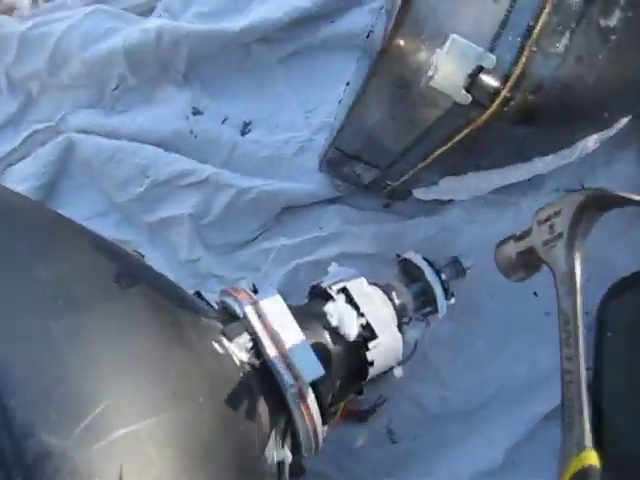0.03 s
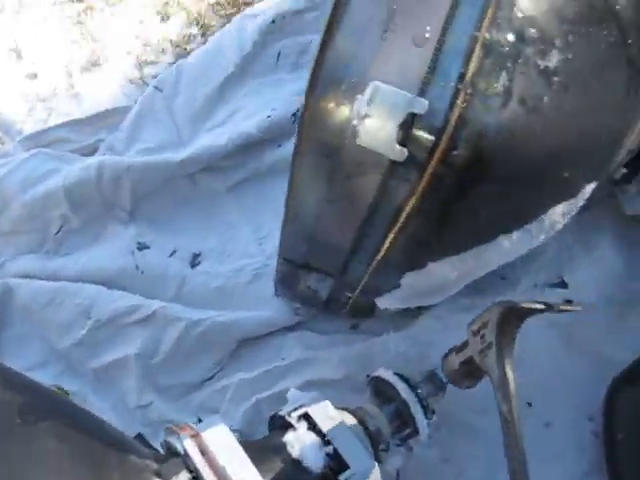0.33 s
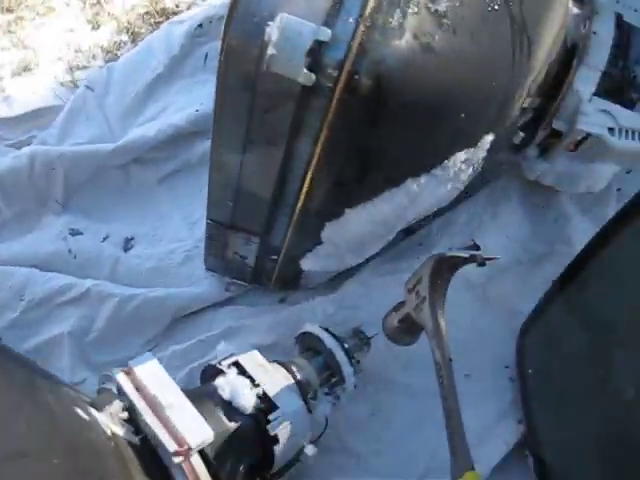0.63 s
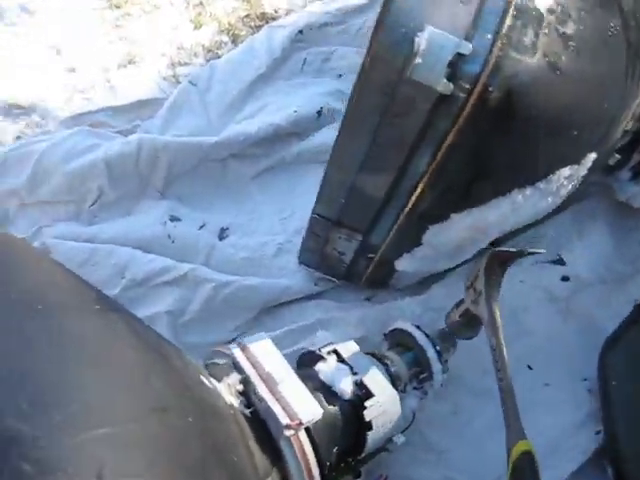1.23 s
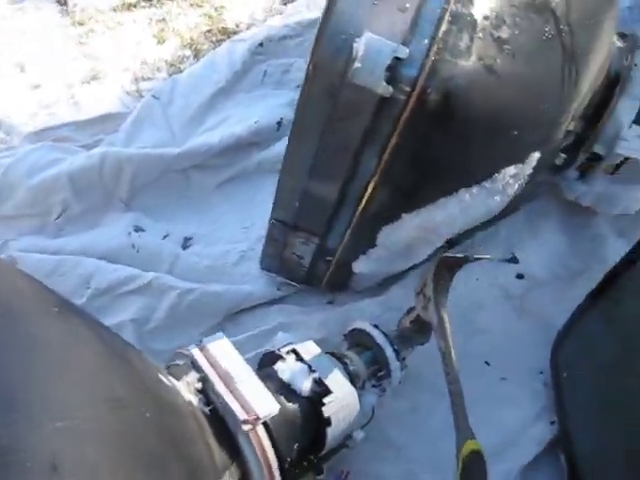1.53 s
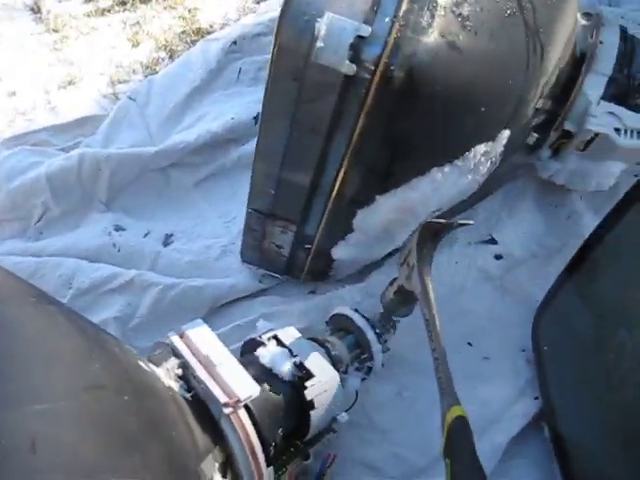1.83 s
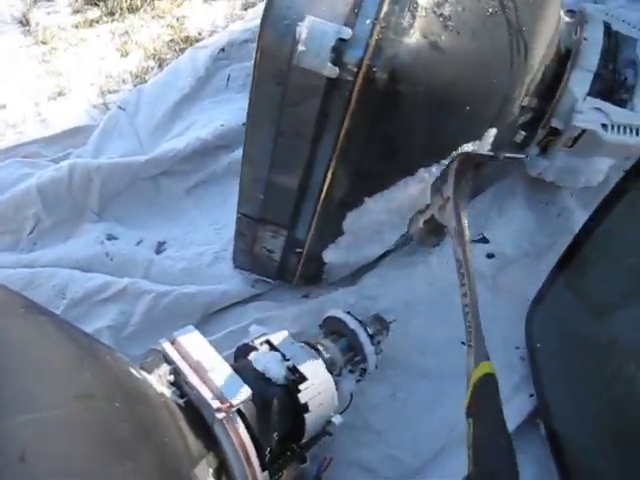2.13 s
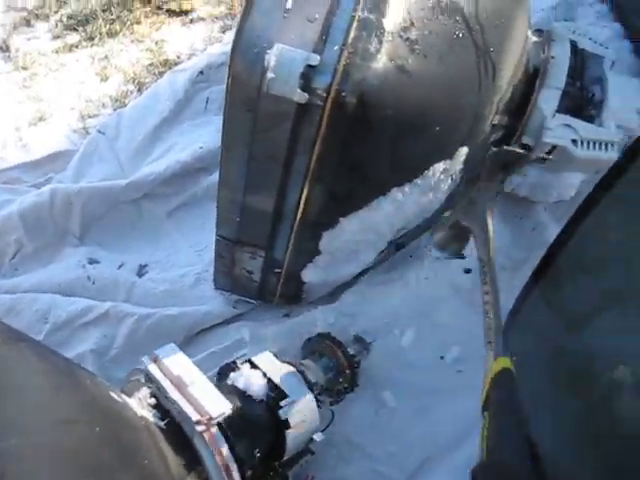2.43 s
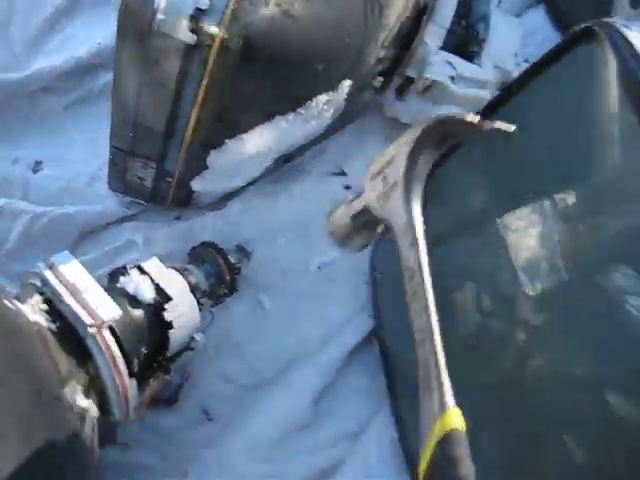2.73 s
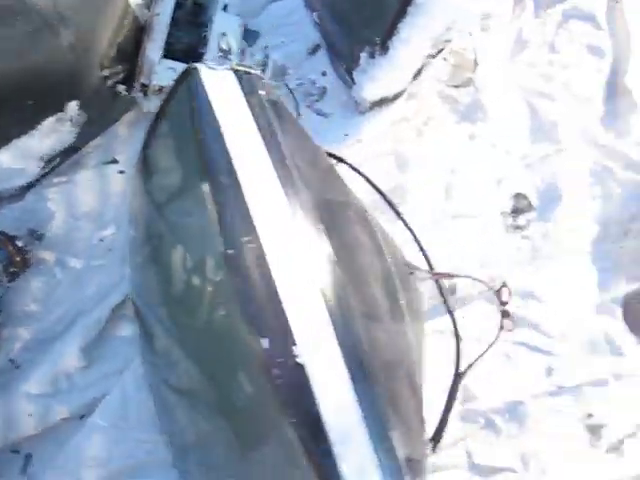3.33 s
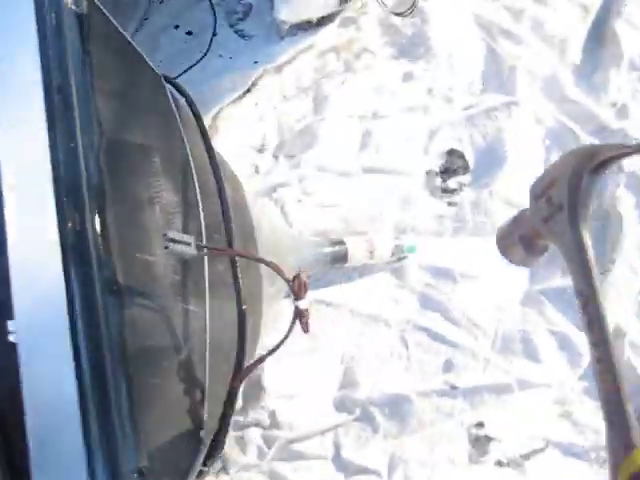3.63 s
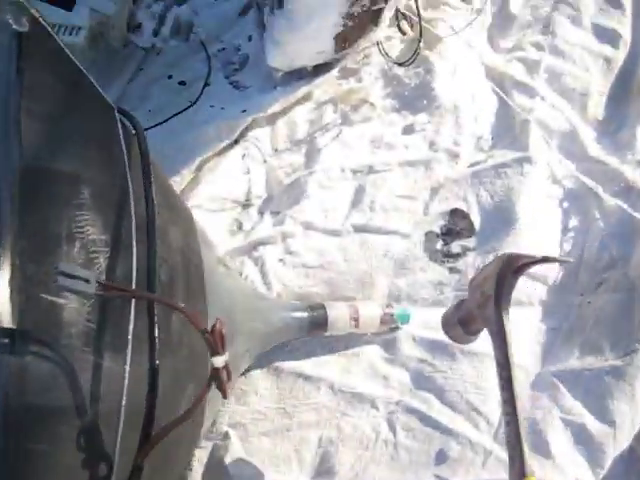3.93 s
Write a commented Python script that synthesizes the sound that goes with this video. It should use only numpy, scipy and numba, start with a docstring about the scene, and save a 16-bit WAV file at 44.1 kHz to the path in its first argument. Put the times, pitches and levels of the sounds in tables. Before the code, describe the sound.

Three ringing hammer taps crack a glass picture tube, followed by a short, loud hiss.

```python
"""Breaking the vacuum of a picture tube

Outdoors, a steel hammer strikes the tube's glass neck three times; head and tube ring in their modes.
The third blow cracks the neck, and air hisses into the vacuum until the pressures are equal.
Clothing swishes and a hand-held camera is bumped, over a distant motor's hum and whine.
The camera's gain control ducks after each blow."""
import sys
import numpy as np
from scipy import signal
from scipy.fft import rfft, irfft, next_fast_len
from scipy.io import wavfile
from scipy.ndimage import map_coordinates
from numba import njit

SR = 44100
rng = np.random.default_rng(int(sys.argv[2]) if len(sys.argv) > 2 else 0)


def waveform_to_disk(signal):
    """Save audio, clipped to [-1, 1], as 16-bit WAV at the path in sys.argv[1]."""
    frames = np.transpose(np.atleast_2d(signal))
    scaled = np.clip(frames, -1, 1) * 32767
    samples = np.round(scaled).astype(np.int16)
    wavfile.write(sys.argv[1], SR, samples)


N = 176400

# level of the motor as the camera moves: time_s, level_db
MOTOR_LEVELS = [(0, -33.5), (.6, -31), (2.3, -30.5), (2.799, -44), (3.15, -38.5), (3.5, -36.5), (4, -32)]
# steady tones of its whine: pitch_hz, relative_db
WHINE_TONES = [(1965, -57), (2745, -59), (2773.5, -46.5)]
# spectrum of the open air: frequency_hz, density_db
AIR_SPECTRUM = [(20, 6), (50, 16), (95, 10), (160, 2), (350, -6.5), (800, -9.5), (2000, -11.5),
                (2800, -9.5), (4000, -14.5), (5500, -17)]
HUM_HZ, HUM_DRIFT_HZ, WHINE_GAIN_DB, AIR_DB = 57.3, 0.35, 32.3, -39.5

# swish as the arm takes aim: time_s, relative_treble_db, relative_middle_db
AIM_SWISH = [(0.0, -39.5, -43.5), (0.048, -36.5, -41), (0.24, -30, -39), (.44, -34, -42), (.57, -40.5, -44),
             (0.8, -46, -48.5), (0.848, -41.5, -47), (1.072, -45, -48), (1.25, -69, -64)]
# swish on moving to the next tube: time_s, relative_treble_db, relative_middle_db
MOVE_SWISH = [(2.8, -45.5, -45.5), (2.83, -43, -47), (3.32, -52.5, -57.5), (3.34, -38, -42),
              (3.468, -46, -50), (3.574, -47, -54.5), (3.664, -48.5, -48.5), (3.688, -50.5, -57),
              (4.0, -49, -52)]
# treble and middle bands of rubbing cloth: frequency_hz, density_db
CLOTH_TREBLE = [(1200, -22), (2200, 0.5), (3100, 1.5), (4500, 0), (5500, -4)]
CLOTH_MIDDLE = [(80, -17), (280, 1), (500, -3), (1100, -2.5), (1900, -6), (2800, -21)]
# crinkles of cloth: start_s, level_db, t60_s
CRINKLES = [(2.778, -17, .035), (2.8477, -16, .025), (2.976, -27, 0.096), (3.2147, -27, 0.06),
            (3.341, -12.5, 0.046), (3.819, -24, 0.045)]
# spectrum of a crinkle: frequency_hz, density_db
CRINKLE_SPECTRUM = [(150, -18.5), (600, -2), (1500, -3), (3300, 4.5), (5500, 2.5)]

# bumps on the camera body: start_s, level_db, pitch_hz
BUMPS = [(0.278, -18.5, 310), (.377, -19, 285), (.463, -21, 230), (0.578, -21, 132), (2.915, -15.5, 185),
         (2.976, -14.5, 114), (3.301, -7.5, 81), (3.357, -12.5, 150), (3.973, -8, 79.4)]
BUMP_T60_CYCLES, BUMP_RISE_S = 4, .0015

# scuffs of shifting and stepping over: centre_s, level_db, half_width_s
SCUFFS = [(.466, -36, .005), (.581, -37, .011), (3.082, -38.5, 0.012), (3.175, -40, .012),
          (3.391, -33, 0.039), (3.49, -38, 0.041), (3.646, -38.5, 0.031)]
# spectrum of a scuff: frequency_hz, density_db
SCUFF_SPECTRUM = [(150, -19), (500, 2), (900, 3.5), (1600, -27), (4000, -12.5)]

# contacts on the intact neck, the first blow touching twice: start_s, level_db, crack_db, top_modes_db
CONTACTS = [(1.5326, 5.5, 0, -1), (1.5813, -4, -4, -7), (1.9092, 4.5, 2, 4)]
# crack of contact, coloured by the neck: frequency_hz, density_db
CRACK_SPECTRUM = [(330, 4), (1000, -9), (1350, -3), (1950, -14), (2550, 4), (3080, -2), (3600, 6),
                  (4300, -2), (6000, -7)]
# dense, faint ring of the glass: frequency_hz, density_db
SHIMMER_SPECTRUM = [(150, 10), (300, 14.5), (600, -1), (2500, 1), (6000, -4)]
# short-lived modes of the neck: pitch_hz, relative_db, t60_s
NECK_MODES = [(264, -10, .05), (785, -17, .035), (1320, -13, .04), (1600, -20, .035), (2130, -19, .03),
              (2320, -7, .05), (2425, -10, .042), (2570, -9, .018), (2722, -3, .036), (3090, -17, .03),
              (3440, -11, .025), (3640, -2.5, .036), (3930, -12, .035), (4390, -19, .04), (4700, -19, .035),
              (4950, -16, .035), (5350, -20, .03)]
# long-lived modes of the tube's body: pitch_hz, relative_db, t60_s
BODY_MODES = [(258, -33, 1), (268.3, -31, 1.3), (315, -35, .8), (425, -37, 1), (783, -37, .3),
              (2295, -41.5, 1), (2632, -45, 1.1), (3182, -42, .4), (4662, -35, .5)]
CRACK_T60_S, SHIMMER_GAIN_DB, SHIMMER_T60_S = 0.013, -38.5, 1.4
NECK_GAIN_DB, BODY_GAIN_DB, TOP_MODES_ABOVE_HZ = -1, -3.5, 4300

# the hammer head's ring after each blow: start_s, level_db, crest_delay_s, swell_hz, relative_clang_db
HEAD_RINGS = [(1.5326, -22.5, .2, 3.2, 6), (1.9091, -20.5, .175, 3.3, -30), (2.2761, -24, .62, 1.3, -10)]
HEAD_HZ, HEAD_T60_S, CLANG_T60_S, SWELL_DEPTH = 4112, 2.1, .33, .5

# snap of the breaking neck: frequency_hz, density_db
SNAP_SPECTRUM = [(450, -16), (1000, -3), (3200, 0), (5500, -4)]
# knock as the neck gives way: pitch_hz, level_db, t60_s
KNOCK_MODES = [(90, -6, 0.045), (970, -2, 0.016), (1800, 3, .011), (3280, 3, .011), (4700, 1, .012)]
SNAP_S, SNAP_T60_S = 2.2762, .012

# the air jet while choked and while slowing: frequency_hz, density_db
CHOKED_JET = [(60, -23.5), (118, -14.5), (700, -13.5), (785, -10), (896, -13), (1870, -9.5), (2220, -5.5),
              (3060, -6), (3600, -4), (3870, -.5), (4450, -5), (5500, -5), (7150, -10)]
SLOWING_JET = [(60, -31), (250, -2), (800, -16), (1500, -6), (2550, 4), (3170, -5), (3850, 5.5),
               (4700, -2.5), (5500, -6)]
INRUSH_S, INRUSH_RISE_S, INRUSH_DB = 2.277, 0.005, -4
CHOKED_UNTIL_S, JET_CHANGE_S = 2.582, 0.12
FALL_S, FALL_DB, FALL_EXPONENT = .21, 31, 2.5

# hollow sound of the last air to enter: frequency_hz, density_db
CAVITY_SPECTRUM = [(700, -30), (1150, -13), (1300, 0), (1420, -10), (1620, -7), (1800, -17), (2500, -26)]
CAVITY_CENTRE_S, CAVITY_HALF_WIDTH_S, CAVITY_DB = 2.77, 0.14, -36

# response of the microphone: frequency_hz, gain_db
MIC_RESPONSE = [(20, -0.5), (5200, 0), (5600, -3), (5900, -13.5), (6250, -28), (6600, -73.5)]
KNEE_DB, ATTACK_S, RELEASE_S = -17.5, 0.0019, 0.14
SLOW_SHARE, SLOW_ATTACK_S, SLOW_RELEASE_S = 0.52, 0.42, 4.1
LOWPASS_HZ, TOP_HZ, OVERLOAD, FULL_SCALE = 5800, 16000, 0.73, .72


def amp(db):
    """Amplitude ratio of a level in decibels."""
    return 10 ** (np.asarray(db) / 20)


def unit(x):
    """Normalisation to an rms of 1."""
    return x / np.sqrt(np.mean(x ** 2) + 1e-20)


def clock():
    """Time of every sample in seconds."""
    return np.arange(N) / SR


def since(start_s):
    """Time elapsed since an onset, zero before it."""
    return np.maximum(clock() - start_s, 0)


def decay(start_s, t60_s):
    """Exponential decay: a jump to 1, then a fall of 60 dB every t60_s."""
    return (clock() >= start_s) * np.exp(-np.log(1000) * since(start_s) / t60_s)


def rise(start_s, rise_s):
    """First-order growth from 0 towards 1."""
    return 1 - np.exp(-since(start_s) / rise_s)


def gaussian(centre_s, half_width_s):
    """Gaussian envelope, down to 1/e at half_width_s either side of its centre."""
    return np.exp(-((clock() - centre_s) / half_width_s) ** 2)


def coloured(x, curve):
    """Linear filtering by a curve of (frequency_hz, gain_db), interpolated in log frequency."""
    size = next_fast_len(N + 8192)
    hz, db = np.transpose(curve)
    gain_db = np.interp(np.log(np.fft.rfftfreq(size, 1 / SR) + 1), np.log(hz + 1), db)
    return irfft(rfft(x, size) * amp(gain_db), size)[:N]


def noise(spectrum):
    """White noise filtered to the shape of a spectrum, at rms 1."""
    return unit(coloured(rng.standard_normal(N), spectrum))


def wobble(rate_hz):
    """Smooth random modulation: a spline through rate_hz knots a second."""
    return map_coordinates(rng.standard_normal(2000), [clock() * rate_hz], mode='wrap')


def ring(modes, start_s, scatter_db):
    """Modal superposition: damped sinusoids struck together, each a little random in strength."""
    out = np.zeros(N)
    onset = round(start_s * SR)
    for (hz, db, t60_s), chance in zip(modes, rng.standard_normal(len(modes))):
        t = clock()[:min(N - onset, int(2 * t60_s * SR))]
        envelope = amp(db + scatter_db * chance) * np.exp(-np.log(1000) * t / t60_s)
        out[onset:onset + len(t)] += envelope * np.sin(2 * np.pi * hz * t)
    return out


def motor_and_air():
    """Periodic vibration gives a line spectrum: a distant motor's hum and whine, over open-air noise."""
    cycles = np.cumsum(HUM_HZ + HUM_DRIFT_HZ * wobble(21)) / SR
    hum = np.sin(2 * np.pi * cycles)
    whine = sum(amp(db) * np.sin(2 * np.pi * hz * clock() + .25 * wobble(14)) for hz, db in WHINE_TONES)
    motor_db = np.interp(clock(), *np.transpose(MOTOR_LEVELS))
    return amp(motor_db) * (hum + amp(WHINE_GAIN_DB) * whine) + amp(AIR_DB) * noise(AIR_SPECTRUM)


def swish(levels, gain_db, grain_db, fade_s=0.14):
    """Sliding friction: cloth rubs on cloth in small uneven slips, giving a grainy noise."""
    times_s, treble_db, middle_db = np.transpose(levels)
    t = clock()
    treble = amp(np.interp(t, times_s, treble_db)) * noise(CLOTH_TREBLE)
    middle = amp(np.interp(t, times_s, middle_db)) * noise(CLOTH_MIDDLE)
    fade = np.clip(np.minimum(t - times_s[0], times_s[-1] - t) / fade_s + 1, 0, 1)
    slips = unit(amp(grain_db * wobble(220)))
    return amp(gain_db) * fade * (treble + middle) * slips


def clothing():
    """Friction noise of cloth in two spells, with crinkles as sharper transients."""
    bursts = sum(amp(db) * decay(s, t60_s) * rise(s, rise_s=0.0006) for s, db, t60_s in CRINKLES)
    crinkles = noise(CRINKLE_SPECTRUM) * bursts
    aiming = swish(AIM_SWISH, gain_db=2.5, grain_db=1.1)
    moving = swish(MOVE_SWISH, gain_db=8.3, grain_db=3.2)
    return aiming + moving + crinkles


def camera_bumps():
    """Heavily damped oscillation: each bump on the camera body dies within a few cycles."""
    out = np.zeros(N)
    for start_s, db, hz in BUMPS:
        envelope = amp(db) * decay(start_s, BUMP_T60_CYCLES / hz) * rise(start_s, BUMP_RISE_S)
        out += envelope * np.sin(2 * np.pi * hz * since(start_s))
    return out


def scuffs():
    """Friction on the ground sheet gives short swells of dull noise."""
    return noise(SCUFF_SPECTRUM) * sum(amp(db) * gaussian(s, half_s) for s, db, half_s in SCUFFS)


def struck_glass():
    """Impact excites normal modes: the neck clinks, the body rings; light contact wakes less treble."""
    out = np.zeros(N)
    for start_s, db, crack_db, top_db in CONTACTS:
        crack = amp(crack_db) * noise(CRACK_SPECTRUM) * decay(start_s, CRACK_T60_S)
        shimmer = amp(SHIMMER_GAIN_DB) * noise(SHIMMER_SPECTRUM) * decay(start_s, SHIMMER_T60_S)
        modes = [(hz, mode_db + top_db * (hz > TOP_MODES_ABOVE_HZ), t60_s)
                 for hz, mode_db, t60_s in NECK_MODES]
        neck = amp(NECK_GAIN_DB) * ring(modes, start_s, scatter_db=1.0)
        body = amp(BODY_GAIN_DB) * ring(BODY_MODES, start_s, scatter_db=2.5)
        out += amp(db) * (crack + shimmer + neck + body)
    return out


def hammer_head():
    """Free vibration of one steel mode: it clangs, then swells and dips as the hammer swings."""
    out = np.zeros(N)
    for start_s, db, crest_delay_s, swell_hz, clang_db in HEAD_RINGS:
        t = since(start_s)
        swell = np.abs(1 + SWELL_DEPTH * np.exp(2j * np.pi * swell_hz * (t - crest_delay_s)))
        clang = amp(clang_db) * decay(start_s, CLANG_T60_S)
        tone = amp(db) * decay(start_s, HEAD_T60_S) * np.sin(2 * np.pi * HEAD_HZ * t)
        out = np.where(clock() >= start_s, (swell + clang) * tone, out)  # each blow restarts the ring
    return out


def fracture():
    """Brittle fracture: the last blow breaks the neck with a snap and a knock that hardly ring."""
    snap = noise(SNAP_SPECTRUM) * decay(SNAP_S, SNAP_T60_S)
    return snap + ring(KNOCK_MODES, SNAP_S, scatter_db=1.0)


def inrush():
    """Choked flow: the jet through the neck hisses steadily, then thins and dies as pressures even out."""
    unchoked_s = since(CHOKED_UNTIL_S)
    slowing = np.clip(unchoked_s / JET_CHANGE_S, 0, 1)
    jet = np.sqrt(1 - slowing) * noise(CHOKED_JET) + np.sqrt(slowing) * noise(SLOWING_JET)
    fall_db = FALL_DB * (unchoked_s / FALL_S) ** FALL_EXPONENT
    flutter_db = 0.44 * wobble(48)
    return jet * amp(INRUSH_DB - fall_db + flutter_db) * rise(INRUSH_S, INRUSH_RISE_S)


def tube_cavity():
    """Cavity resonance: the nearly full tube sounds hollow as the last air enters."""
    return noise(CAVITY_SPECTRUM) * amp(CAVITY_DB) * gaussian(CAVITY_CENTRE_S, CAVITY_HALF_WIDTH_S)


@njit
def follow(x, attack_s, release_s):
    """Envelope following: first-order smoothing with one time constant upward, another downward."""
    out, level = np.zeros(len(x)), 0.
    for i in range(len(x)):
        level += (x[i] - level) / (SR * (attack_s if x[i] > level else release_s))
        out[i] = level
    return out


def gain_control(x):
    """Compression above a knee: a quick stage ducks the blows, a slow one remembers long loud sounds."""
    excess_db = np.maximum(20 * np.log10(np.abs(x) + 1e-9) - KNEE_DB, 0)
    quick_db = follow(excess_db, ATTACK_S, RELEASE_S)
    slow_db = follow(SLOW_SHARE * quick_db, SLOW_ATTACK_S, SLOW_RELEASE_S)
    return x * amp(-np.maximum(quick_db, slow_db))


def scene():
    """Superposition: the pressures of all sources add at one microphone."""
    blows = struck_glass() + hammer_head() + fracture()
    filling = inrush() + tube_cavity()
    movement = clothing() + scuffs() + camera_bumps()
    mono = blows + filling + movement + motor_and_air()
    return np.array([mono, mono])


def record(dry):
    """Band limiting, compression and saturation: a narrow-band mono camera overloads on the blows."""
    x = signal.sosfilt(signal.butter(10, LOWPASS_HZ, fs=SR, output='sos'), dry[0])
    x = OVERLOAD * np.tanh(gain_control(x) / OVERLOAD)
    x = np.clip(coloured(x, MIC_RESPONSE), -FULL_SCALE, FULL_SCALE)
    x = coloured(x, [(TOP_HZ - 500, 0), (TOP_HZ + 1000, -80)])
    return np.array([x, x])


dry = scene()
out = record(dry)
waveform_to_disk(out)
```